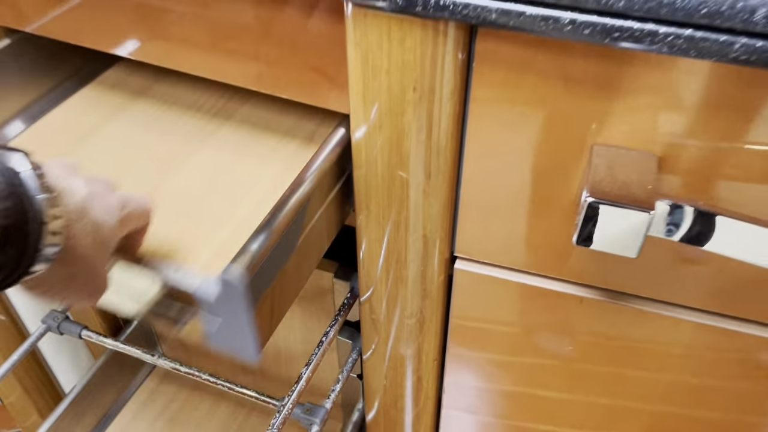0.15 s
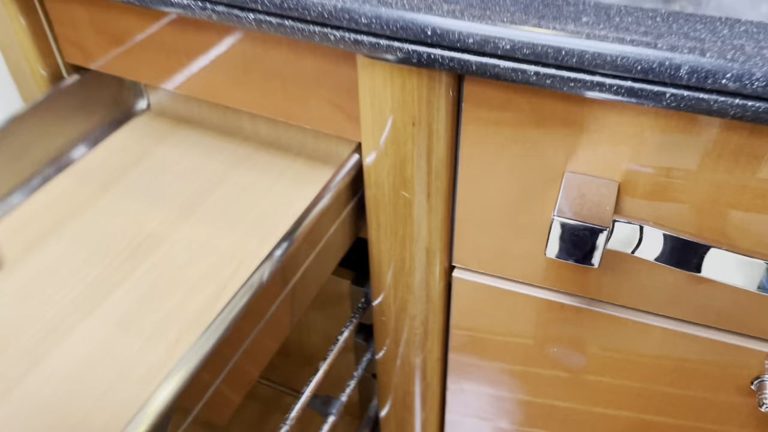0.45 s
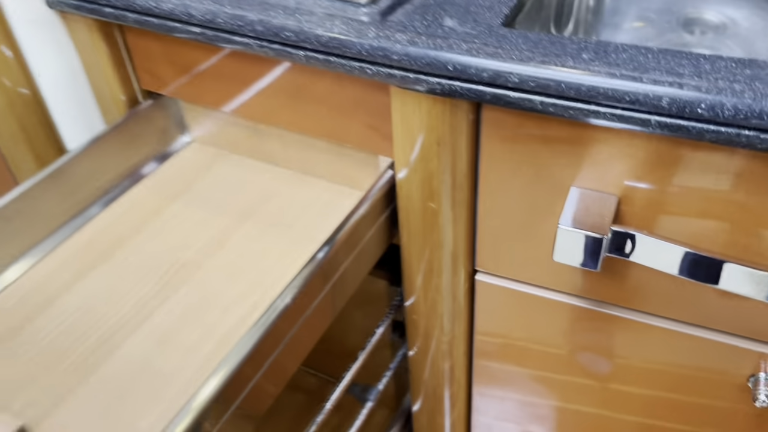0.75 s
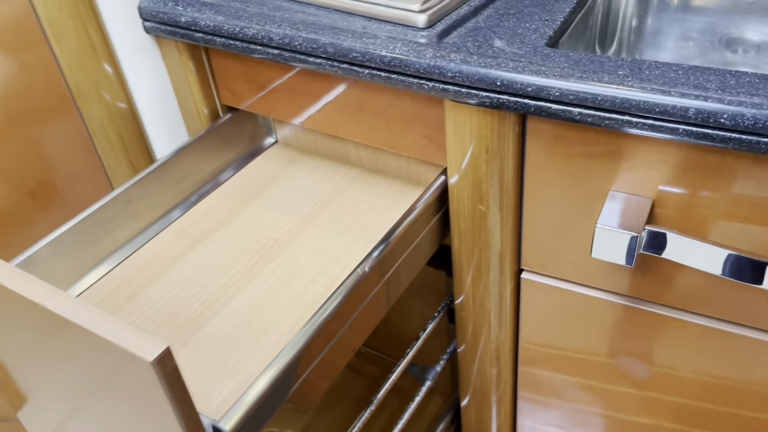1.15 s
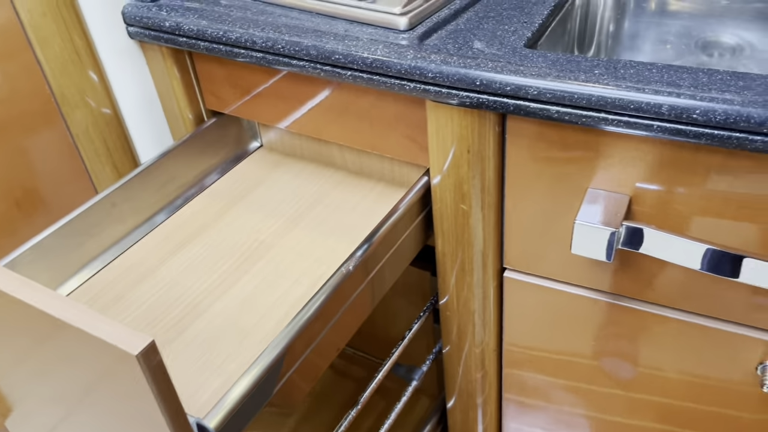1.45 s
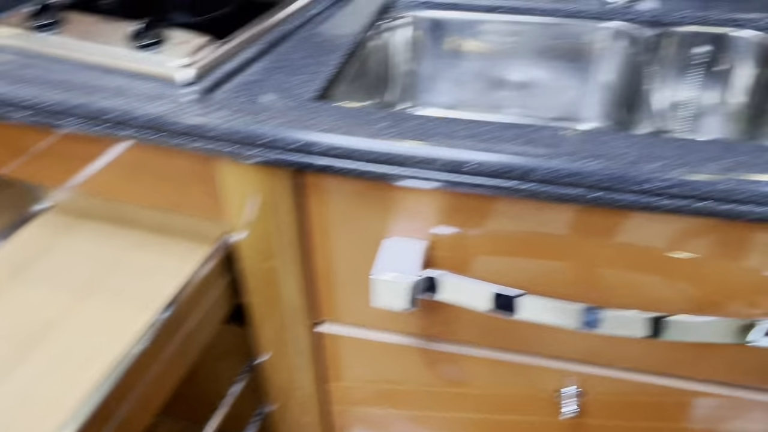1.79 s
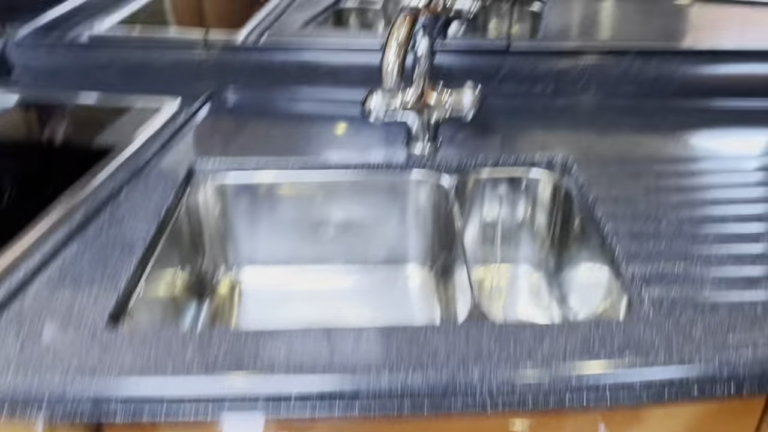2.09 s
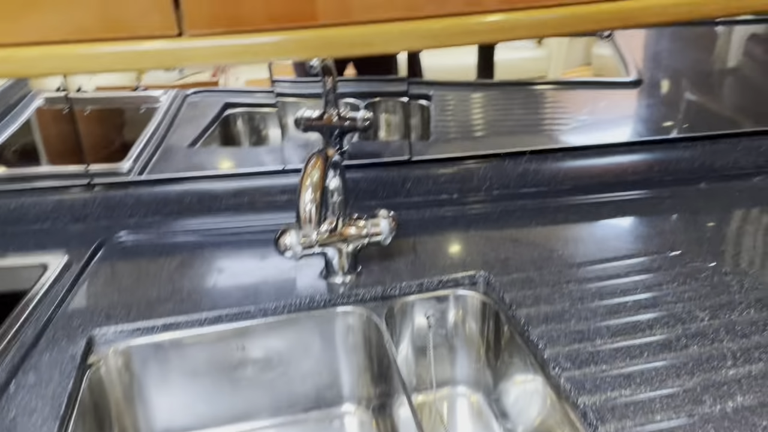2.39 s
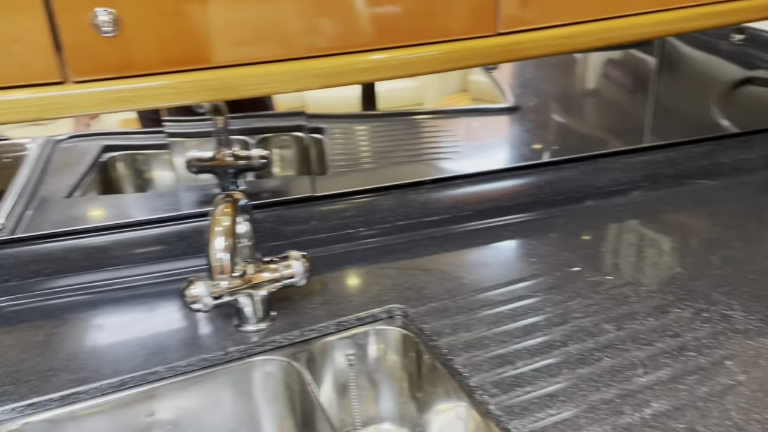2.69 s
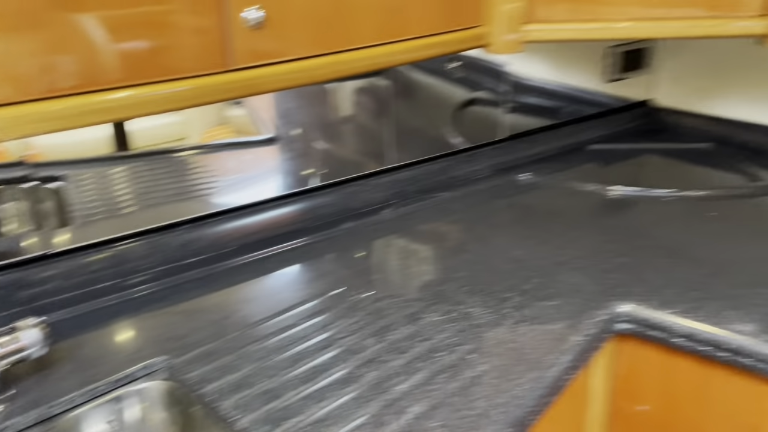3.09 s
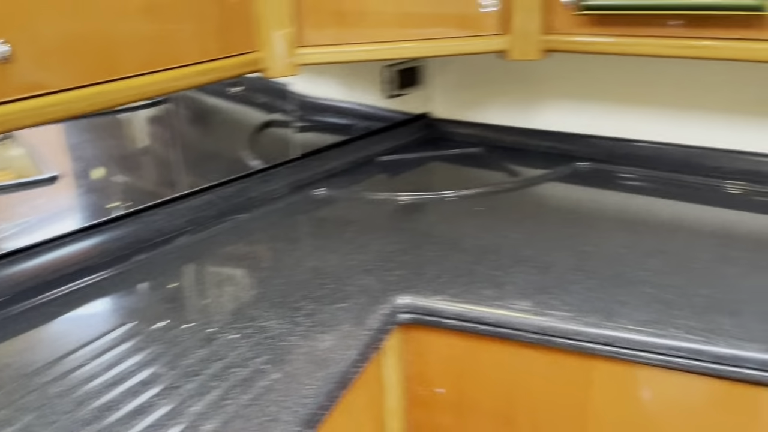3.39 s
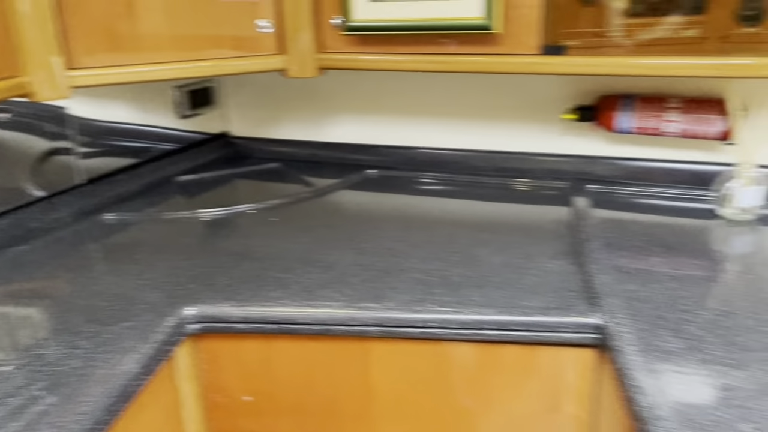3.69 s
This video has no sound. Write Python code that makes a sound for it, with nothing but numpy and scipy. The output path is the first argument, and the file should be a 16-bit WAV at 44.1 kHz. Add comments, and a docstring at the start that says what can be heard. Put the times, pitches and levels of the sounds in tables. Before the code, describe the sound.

A wooden drawer on metal runners rolls open, knocks at its stop, then bangs shut.

```python
"""Rollers rumble over a quiet cabin hum: a wooden drawer on metal runners, close by in a small boat cabin.
It is pulled out to its stop, knocked loose and, after a sleeve rustle, pushed shut.
Knocks are short rattles of noise that ring the drawer box, thud the hull and crack in the runners.
Rolling is a stream of scattered bumps; small metal ticks and a drifting rub of the rail lie between.
The microphone is a hand-held phone with two ports; the cabin adds a short tail."""
import sys
import numpy as np
from scipy import signal
from scipy.fft import rfft, irfft, next_fast_len
from scipy.io import wavfile
from scipy.ndimage import uniform_filter1d

SR = 44100
rng = np.random.default_rng(int(sys.argv[2]) if len(sys.argv) > 2 else 0)


def persist_wave(psi):
    """Save psi, clipped to +-1, as 16-bit WAV."""
    counts = np.round(np.clip(psi, -1, 1) * 32767).astype(np.int16)
    wavfile.write(sys.argv[1], SR, np.atleast_2d(counts).T)


def invert_db(x):
    """Field ratio 10**(x/20) for x, a level in decibels (scalar or array-like)."""
    u = np.asarray(x, float) / 20
    return 10 ** u


N = 169785  # samples, 3.85 s


def along_hz(table, size):
    """Table value at each FFT bin, straight on a log axis."""
    hz, value = np.array(table, float).T
    return np.interp(np.log(np.fft.rfftfreq(size, 1 / SR) + 1), np.log(hz + 1), value)


def unit(x):
    """Scale to rms 1."""
    return x / np.sqrt(np.mean(x ** 2))


def peak(x, db):
    """Scale to a peak level."""
    return x * invert_db(db) / np.abs(x).max()


def add(out, s, x):
    """Mix x into out from time s."""
    i = int(s * SR)
    out[i:i + len(x)] += x[:len(out) - i]


def colour(x, table):
    """Causal minimum-phase filter through (frequency [Hz], level [dB]) points, power gain 1."""
    cepstrum = irfft(np.log(invert_db(along_hz(table, 4096))))
    cepstrum[1:2048] *= 2  # fold onto positive time
    cepstrum[2049:] = 0
    h = irfft(np.exp(rfft(cepstrum)))[:2048]
    return signal.fftconvolve(x, h / np.sqrt(np.sum(h ** 2)))[:len(x)]


def ring(modes, scatter_db, seconds=.7):
    """Impulse response of decaying modes, each with a random sign and scattered level; energy 1."""
    t = np.arange(int(seconds * SR))[:, None] / SR
    hz, db, t60 = np.array(modes, float).T
    chance = rng.standard_normal((2, len(hz)))
    share = invert_db(db + scatter_db * chance[0]) * np.sign(chance[1])
    h = (share * np.sin(2 * np.pi * hz * t) * invert_db(-60 * t / t60)).sum(1)
    return h / np.sqrt(np.sum(h ** 2))


def bumps(size, per_s, spread_db):
    """Scattered clicks of uneven size, rms 1."""
    hit = rng.random(size) < per_s / SR
    strength = rng.standard_normal(size) * invert_db(spread_db * rng.exponential(size=size))
    return unit(hit * strength + 1e-9)


# Hum of the cabin: (frequency [Hz], relative level per Hz [dB])
CABIN_TONE = [(15, -31.5), (35, 2.5), (65, -1), (130, -15), (250, -13.5), (500, -31.5), (1000, -32),
              (3000, -43.5), (8600, -42.5), (16300, -52.5)]


def cabin_hum():
    """Steady noise, strongest in the bass, behind everything."""
    level_db = -58  # rms
    return invert_db(level_db) * colour(rng.standard_normal(N), CABIN_TONE)


# Strength of the sleeve's brushing: (time [s], level [dB])
RUSTLE_LEVEL = [(1.3, -84), (1.386, -69), (1.586, -61.5), (1.694, -58.5), (1.726, -65), (1.798, -67.5),
                (1.832, -62.5), (1.908, -75), (1.93, -47)]
# Tone of the cloth: (frequency [Hz], relative level [dB])
RUSTLE_TONE = [(240, -60), (400, -12.5), (900, -6), (2300, -11), (6500, -18.5), (9000, -14.5),
               (13000, -28.5), (16300, -35.5)]


def rustle():
    """Cloth brushes as the arm reaches back: dense small clicks, coloured."""
    t = np.arange(N) / SR
    s, db = np.array(RUSTLE_LEVEL, float).T
    return invert_db(np.interp(t, s, db, -120, -120)) * colour(bumps(N, 5300, 1.1), RUSTLE_TONE)


# Rubbing resonance of the rail: (time [s], frequency [Hz], level [dB])
SCRAPE_PATH = [(0, 1300, -44), (0.098, 1100, -47), (0.198, 952, -59), (.24, 1000, -90),
               (0.798, 1700, -89.5), (.92, 1683, -70), (1.3, 1616, -68.5), (1.45, 1584, -90.5),
               (2.15, 1538, -82.5), (2.232, 1597, -62), (2.321, 1800, -63), (2.449, 1950, -56),
               (2.518, 2001, -62.5), (2.599, 2408, -75), (2.751, 2686, -64.5), (2.849, 2550, -65.5),
               (2.959, 2460, -55), (3.02, 2465, -77)]


def scrape():
    """A faint rubbing resonance of the rail, narrow noise that drifts in pitch as the drawer moves."""
    t = np.arange(N) / SR
    s, hz, db = np.array(SCRAPE_PATH, float).T

    def slow_noise():
        smooth = 59  # samples; sets the width of the resonance
        return unit(uniform_filter1d(uniform_filter1d(rng.standard_normal(N), smooth), smooth))

    phase = 2 * np.pi * np.cumsum(np.interp(t, s, hz)) / SR
    rub = slow_noise() * np.cos(phase) + slow_noise() * np.sin(phase)
    return invert_db(np.interp(t, s, db, -120, -120)) * rub


# Hull and cabinet modes: (frequency [Hz], relative level [dB], T60 [s])
HULL_MODES = [(52.6, -11, 0.76), (77, 8.5, 0.11), (106, 11, 0.04), (177, -6, 0.1)]


def hull(force, scatter_db):
    """The hull and cabinet ring at their low modes under a force."""
    return signal.fftconvolve(force, ring(HULL_MODES, scatter_db))


# Rolling, pulled out and pushed in: (time [s], box rumble level [dB], hull rumble level re box [dB],
# rasp level re box [dB], hiss level re box [dB])
ROLL_OUT = [(0, -44, -2, 2, -11), (.1, -42.5, -12, 3, -8), (.16, -32, -22.5, -7, -18),
            (.21, -38.5, -18, 4.5, -9.5), (.26, -25, -8, -5.5, -15), (.37, -24.5, -14.5, -14, -30.5),
            (.48, -31.5, -21, -9.5, -27.5), (.51, -32.5, -7.5, -9, -23.5), (.6, -30.5, -26, -6, -15),
            (.72, -36.5, -5.5, -6, -15), (.8, -45, 4, -9.5, -16), (.95, -56.5, 8.5, -4.5, -5),
            (1.1, -73, 20, -6, -0.5), (1.4, -73, -11, -15, -7)]
ROLL_IN = [(1.978, -18.5, -8, -7, -23), (2.1, -43, 2, -16, -17.5), (2.2, -45, -8, -8.5, -19.5),
           (2.24, -44.5, -12, -12.5, -17.5), (2.33, -43, -5.5, -10, -16.5), (2.4, -41.5, -6, -9.5, -11),
           (2.5, -44, -8, -9, -28), (2.6, -38, -1.5, -14.5, -23), (2.7, -44, 4, -6, -19.5),
           (2.8, -47, -10.5, -2.5, -14), (2.901, -43, -5.5, -5, -21), (2.941, -44.5, -9, 0, -9.5),
           (2.958, -44, -9, -12, -5), (3.0, -42, 1, 11, -6.5), (3.148, -37.5, -5.5, -16, -15.5),
           (3.231, -40.5, 15.5, -3, -23), (3.378, -46, 14.5, -10.5, -21.5), (3.469, -66.5, 11, -1, -1),
           (3.6, -76, 9.5, -27.5, -5), (3.85, -75, 27.5, -15, -33.5)]
# Hum of the open drawer as it rolls: (frequency [Hz], relative level [dB], T60 [s])
OUT_MODES = [(168, -15.5, .08), (322.6, 0.5, 0.2), (385.8, -1.5, 0.17), (455.7, 0, 0.12), (547, -2.5, 0.12),
             (675, -17, 0.065)]
# Box rumble on the way in: (frequency [Hz], relative level [dB])
IN_TONE = [(110, -40), (195, -17.5), (235, -1), (285, 0), (356, -6.5), (440, -2.5), (616, -13.5),
           (740, -10), (980, -39), (1650, -120)]
# Rasp and hiss of the metal: (frequency [Hz], relative level [dB])
RASP_TONE = [(350, -37.5), (550, -1.5), (750, -1), (950, -3), (1300, -9), (1700, -18.5), (2500, -46.5)]
HISS_TONE = [(900, -25), (1500, -1.5), (2800, -6.5), (6500, -16), (8600, -12.5), (11000, -19.5),
             (14500, -36), (16300, -55)]


def rolling():
    """Rollers bump along the rails: rumble in box and hull, rasp and hiss in the metal."""
    t = np.arange(N) / SR
    force = bumps(N, 2500, 1.0)
    hull_rumble = unit(hull(force, 1.)[:N])
    rasp = colour(force, RASP_TONE)
    hiss = colour(bumps(N, 5000, 1.8), HISS_TONE)
    out_rumble = signal.fftconvolve(force, ring(OUT_MODES, 0))[:N]
    in_rumble = colour(force, IN_TONE)
    out = np.zeros(N)
    for rows, box_rumble in ((ROLL_OUT, out_rumble), (ROLL_IN, in_rumble)):
        s, db, hull_db, rasp_db, hiss_db = np.array(rows, float).T
        moving = (t >= s[0]) * (t <= s[-1])

        def gain(level_db):
            return uniform_filter1d(invert_db(np.interp(t, s, level_db)) * moving, size=400)

        out += gain(db) * box_rumble + gain(db + hull_db) * hull_rumble
        out += gain(db + rasp_db) * rasp + gain(db + hiss_db) * hiss
    return out


# Treble of struck metal: (frequency [Hz], relative level [dB])
SIZZLE_TONE = [(2200, -34), (3800, -7), (6500, -6.5), (8600, -7), (11000, -10.5), (14000, -25.5),
               (16300, -38)]


def sizzle(force):
    """The force heard as bright metal noise."""
    return colour(force, SIZZLE_TONE)


# Ticks in the runners: (time [s], peak level [dB], frequency [Hz], rattle T60 [s], click level re ring [dB])
TICKS = [(.338, -61, 9500, .01, 4), (.398, -44.5, 4100, 0.047, -2.5), (.435, -45.5, 2920, .03, -4),
         (0.548, -11, 2250, 0.018, -16.5), (2.224, -46.5, 6570, 0.016, -6), (2.263, -62, 6840, 0.016, 17.5),
         (2.346, -37.5, 1730, 0.067, -26), (2.35, -43, 6420, .1, -10), (2.362, -35, 2010, 0.17, -19),
         (2.409, -47, 2710, 0.036, -22), (2.475, -38, 2950, 0.023, 1), (2.475, -44.5, 4840, 0.24, -10),
         (2.905, -57.5, 3120, 0.059, 6.5), (2.954, -47, 3140, 0.1, 12)]


def ticks():
    """Loose runner parts chatter briefly: close, short metal modes and a click."""
    out = np.zeros(N)
    t = np.arange(SR // 5) / SR
    for s, db, hz, t60, click_db in TICKS:
        force = rng.standard_normal(len(t)) * invert_db(-60 * t / max(t60, .005))
        cluster = [(hz * ratio, -3. * k, .014) for k, ratio in enumerate((1, 1.08, .91))]
        add(out, s - .001, peak(signal.fftconvolve(force, ring(cluster, 2.1, .1)), db))
        add(out, s - .001, peak(sizzle(force), db + click_db))
    return out


# Bare clank of the runners: (frequency [Hz], relative level [dB])
CLANK_TONE = [(500, -20), (900, 3), (1200, 6.5), (1700, 0.5), (2100, 0.5), (2500, -4.5), (3200, -10.5),
              (4500, -19), (8000, -55)]
# Modes of the steel rails: (frequency [Hz])
RUNNER_HZ = [1076, 1210, 1434, 1691, 2003, 2292, 2730, 3800]


def runner_clank(force, rise):
    """Struck rails: a coloured crack, shifted up for a fast rise, plus the ring of their modes."""
    soft_rise_s, hardness = 0.0033, .5
    ring_t60_s, ring_db = .04, -12  # ring gain against the bare clank
    up = np.clip(soft_rise_s / rise, 1, 4) ** hardness
    clank = colour(force, [(hz * up, db) for hz, db in CLANK_TONE])
    rails = ring([(hz, 0, ring_t60_s) for hz in RUNNER_HZ], 4.0)
    return clank + invert_db(ring_db) * signal.fftconvolve(clank, rails)[:len(force)]


# Drawer box modes: (frequency [Hz], level before focus [dB], T60 [s])
BOX_MODES = [(247.3, 4.5, 0.063), (265.5, -1.5, .12), (315.4, 0.5, 0.016), (366.5, -5, 0.077),
             (452, -3, 0.19), (456, -7, 0.063), (550, -1, 0.063), (636, 6.5, 0.021), (747, -15, 0.022),
             (833, 1.5, 0.037), (900, -8.5, 0.018), (1078, -6, 0.16)]


def drawer_box(force, hz):
    """The box rings most near the knock's brightest pitch, where the struck panel adds its own mode."""
    focus_db = 2.5  # fall per squared octave from that pitch
    modes = [(f, db - focus_db * np.log2(f / hz) ** 2, t60) for f, db, t60 in BOX_MODES]
    modes.append((hz, 4, 0.081))  # struck panel
    return signal.fftconvolve(force, ring(modes, 1.3))


# Knocks: (time [s], box peak level [dB], thud level re box [dB], clank level re box [dB],
# sizzle level re box [dB], brightest box frequency [Hz], rise [s], rattle T60 [s])
KNOCKS = [(.223, -17, -24.5, -0.5, -6, 767, 0.0017, 0.18), (.25, -27, -15, -8, -21, 423.2, 0.0048, 0.048),
          (.522, -24, -23.5, 4, -30, 400, 0.0084, 0.045),
          (0.5363, -13.5, -14.5, 12, 1.5, 1053, 0.002, 0.023),
          (0.5403, 2, -25, -11.5, -26, 526, .002, 0.028), (.835, -39, -13.5, 2.5, -10, 714, 0.0068, 0.049),
          (0.855, -35.5, -29, -4, -11, 728, 0.0024, 0.12),
          (1.825, -40.5, -29.5, -8, -20.5, 400, 0.0042, 0.99),
          (1.951, -1, -17, -9.5, -23.5, 479.6, 0.0051, 0.11),
          (2.527, -28, -34.5, -4.5, -16.5, 326, 0.0037, 0.44),
          (2.997, -13.5, -11.5, -16.5, -34, 298.5, 0.006, 0.18),
          (3.021, -6, -4.5, -15, -20.5, 278.1, 0.008, 0.06), (3.036, -10, -2, 5.5, -21, 928, 0.004, 0.044),
          (3.046, 0, -7, -4, -24.5, 460.4, 0.0025, 0.066), (3.244, -24.5, -13, -3, -24, 481, .005, 0.25),
          (3.288, -14.5, -16, -25, -33.5, 293.3, 0.0073, 0.097),
          (3.27, -10.5, -9, -27.5, -27, 276, 0.0012, 0.026),
          (3.785, -54.5, 18.5, -27.5, -35.5, 291, 0.0037, 0.332)]


def knocks():
    """Each knock is a rattle that swells and dies; it rings box and hull, clanks and sizzles in the metal."""
    touch_db, touch_s = 1.5, 0.00037  # sharp start of the metal sound, weakened for rises over 10 ms
    out = np.zeros(N)
    t = np.arange(SR // 2) / SR
    for s, db, thud_db, clank_db, sizzle_db, hz, rise, t60 in KNOCKS:
        swell = np.minimum(t / max(rise, 3e-4), 1) ** 2
        shape = swell * invert_db(-60 * np.maximum(t - rise, 0) / max(t60, .01))
        noise = rng.standard_normal(len(t))
        touch = invert_db(touch_db) * np.exp(-t / touch_s) * min(0.01 / rise, 1) ** 2
        sharp = noise * (shape + touch)
        add(out, s - .001, peak(drawer_box(shape * noise, hz), db))
        add(out, s - .001, peak(hull(shape, 2.0), db + thud_db))
        add(out, s - .001, peak(runner_clank(sharp, rise), db + clank_db))
        add(out, s - .001, peak(sizzle(sharp), db + sizzle_db))
    return out


# Decay of the cabin: (frequency [Hz], T60 [s])
ROOM_T60 = [(100, 0.32), (500, 0.16), (3000, 0.2), (12000, 0.18)]
# Strength of the tail: (frequency [Hz], level [dB])
ROOM_TONE = [(100, -3.5), (500, -8), (3000, -3.5), (12000, -0.5)]
# Part of the tail that has opposite sign at the two ports: (frequency [Hz], amplitude share [0 to 1])
ROOM_UNLIKE = [(60, 0.13), (300, 0.15), (1000, .9), (4000, 1), (7500, 0.25), (14000, 0.38)]


def room(x):
    """Cabin tail: decaying noise, octave by octave, unlike at each port."""
    size = SR // 2
    t = np.arange(size) / SR
    hz = np.fft.rfftfreq(size, 1 / SR)
    noise = rfft(rng.standard_normal((2, size)))
    t60 = along_hz(ROOM_T60, size)
    build_up = np.minimum(t / 0.0063, 1)
    h = np.zeros((2, size))
    for low in 30 * 2. ** np.arange(10):
        band = (hz >= low) & (hz < 2 * low)
        tail = irfft(noise * band, size) * invert_db(-60 * t / max(t60[band].mean(), .05)) * build_up
        h += tail * np.sqrt(band.mean() / np.sum(tail ** 2, 1, keepdims=True))
    unlike = np.clip(along_hz(ROOM_UNLIKE, size), 0, 1)
    common, opposed = rfft(h) * invert_db(along_hz(ROOM_TONE, size))
    sides = np.array([[1], [-1]])
    h = irfft(np.sqrt(1 - unlike ** 2) * common + unlike * opposed * sides, size)
    return signal.fftconvolve(x[None], h, axes=1)[:, :N]


# Left port minus right: (frequency [Hz], phase [rad])
PORT_PHASE = [(0, 0), (300, .5), (1120, 1.6), (1640, 1.9), (2330, .6), (3900, .9), (5100, 1.0),
              (5900, -1.0), (7580, -2.4), (8700, -3.14), (10200, -4.2), (12500, -6.0), (16000, -6.3)]
# Left port minus right: (frequency [Hz], level [dB])
PORT_DB = [(60, -1), (110, -2.5), (380, -0.5), (700, 0), (1290, -1), (2380, -0.5), (4400, 5), (8120, 1),
           (15000, -0.5)]


def ports(x):
    """The phone body delays and shades one port against the other, half the difference on each."""
    size = next_fast_len(N + 4096) // 2 * 2
    turn = invert_db(along_hz(PORT_DB, size) / 2) * np.exp(.5j * along_hz(PORT_PHASE, size))
    return irfft(rfft(x, size) * np.array([turn, 1 / turn]), size)[:, :N]


def scene():
    """Cabin hum and the drawer near the phone, with their tail in the cabin, at the two ports."""
    near = cabin_hum() + rustle() + scrape() + rolling() + ticks() + knocks()
    return ports(near + room(near))


def low_pass(x):
    """Removes everything above the highest recorded frequency."""
    return signal.sosfilt(signal.butter(12, 16460, fs=SR, output="sos"), x)


def record(dry):
    """Bass cut of the microphones, then soft rounding of the peaks."""
    low_cut_hz = 48
    bass_cut = signal.butter(2, low_cut_hz, "high", fs=SR, output="sos")
    mix = np.tanh(signal.sosfilt(bass_cut, dry))
    return low_pass(mix)


dry = scene()
out = record(dry)
persist_wave(out)
```